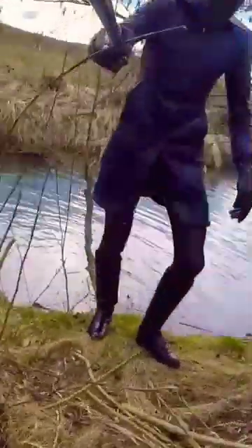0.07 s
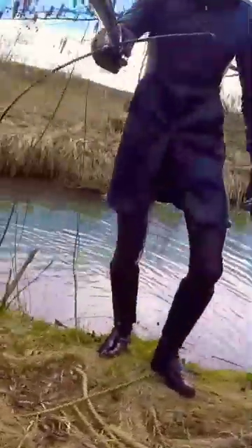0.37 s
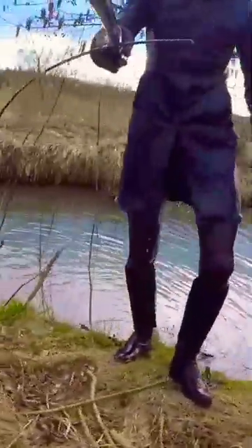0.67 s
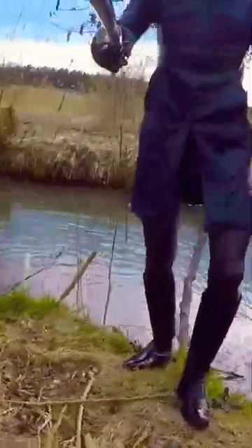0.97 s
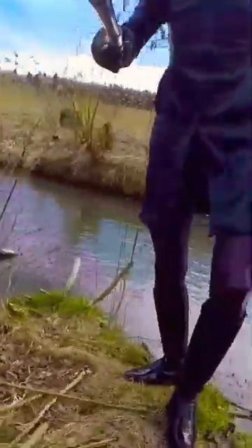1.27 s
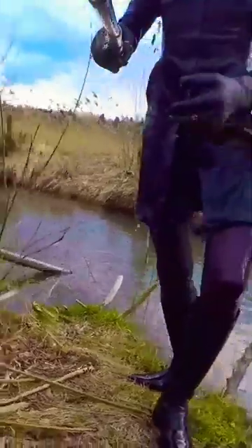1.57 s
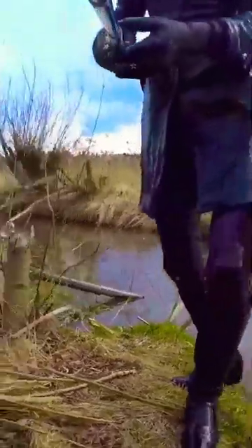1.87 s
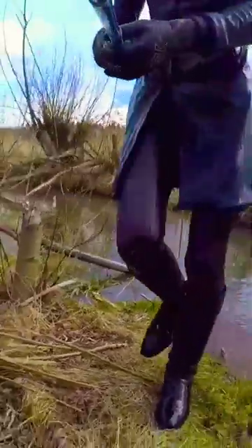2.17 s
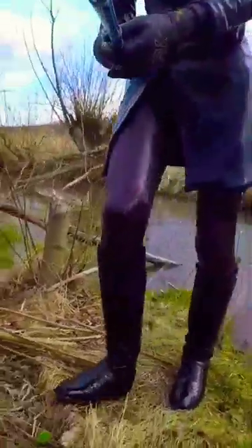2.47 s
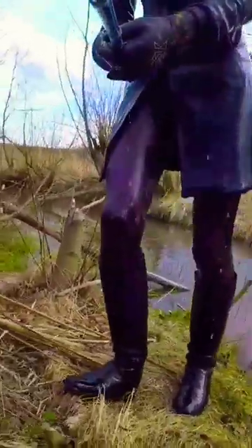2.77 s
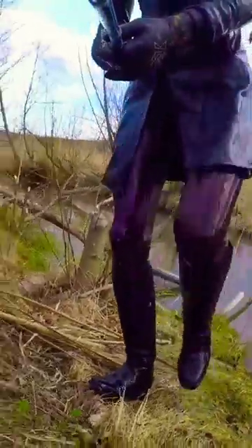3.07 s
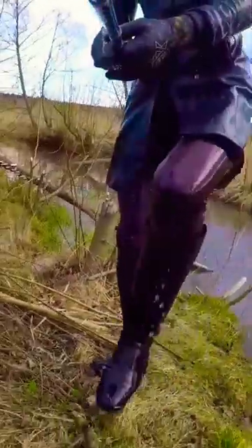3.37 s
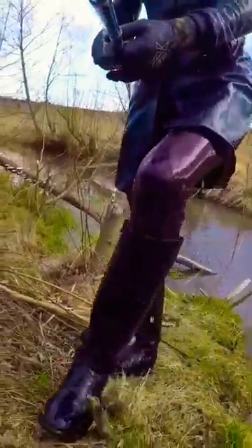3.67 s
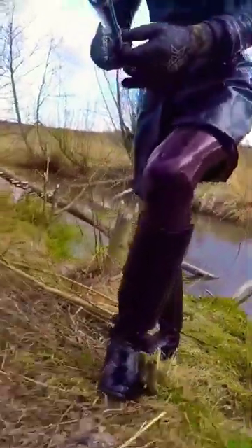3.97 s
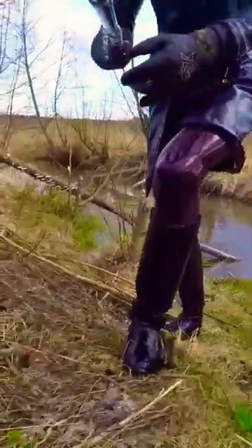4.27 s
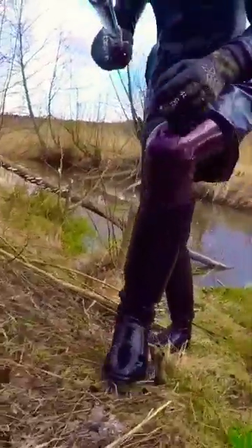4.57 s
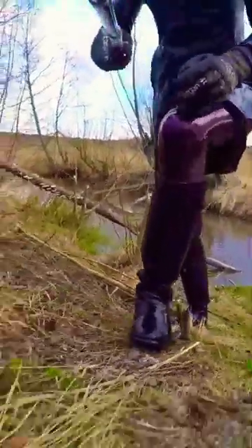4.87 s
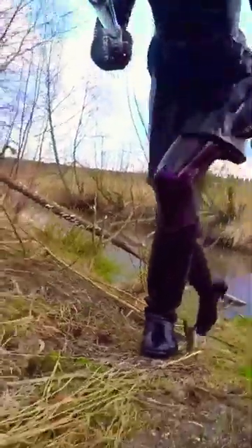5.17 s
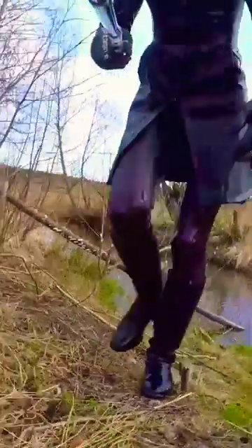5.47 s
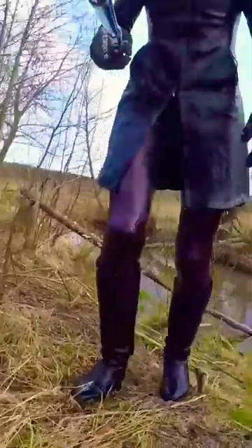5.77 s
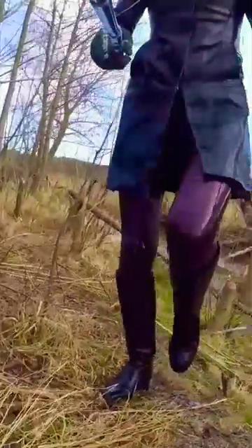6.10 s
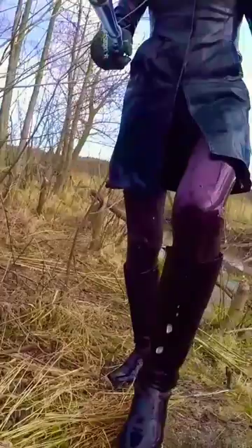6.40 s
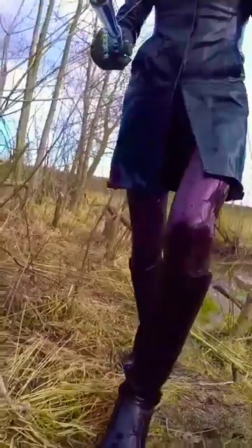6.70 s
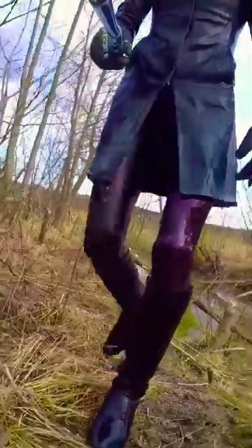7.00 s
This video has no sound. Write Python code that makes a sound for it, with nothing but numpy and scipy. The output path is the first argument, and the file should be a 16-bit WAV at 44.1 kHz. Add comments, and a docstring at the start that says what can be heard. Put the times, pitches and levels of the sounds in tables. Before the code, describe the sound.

Gusty low wind buffeting, close glove scrapes, knocks and thumps on a microphone pole, then soft squelching footsteps further off.

```python
"""A grassy riverbank, where someone in wet boots steps about with a microphone on a hand-held pole.
Wind buffets the microphone over a steady rush of air. A glove slides, scuffs, shoves and knocks the
pole: friction and impact excite its modes, and the tube conducts their ringing to the microphone.
Tiny ticks and faint whistles come and go; further off, the boots squelch and crunch in the wet grass."""
import sys
import numpy as np
from scipy import signal
from scipy.fft import rfft, irfft
from scipy.io import wavfile
from scipy.ndimage import uniform_filter1d

SR = 44100
rng = np.random.default_rng(int(sys.argv[2]) if len(sys.argv) > 2 else 0)


def file_out(sig):
    """Save sig as 16-bit WAV at sys.argv[1]."""
    # one column per channel
    cols = np.atleast_2d(sig).T
    # limit, then scale
    lim = np.clip(cols, -1, 1)
    pcm = np.round(lim * 32767).astype(np.int16)
    wavfile.write(sys.argv[1], SR, pcm)


N = 319284
TIME = np.arange(N) / SR
RING_TIME = TIME[:SR // 4]


def undb(db):
    """Decibels to amplitude ratio."""
    return 10 ** (np.asarray(db) / 20)


def unit(x):
    """Normalise to rms 1."""
    return x / np.sqrt(np.mean(x ** 2) + 1e-18)


def add(out, start_s, x):
    """Superpose x on out from start_s."""
    i = max(int(start_s * SR), 0)
    out[i:i + len(x)] += x[:N - i]


def band(x, low_hz, high_hz, order=2):
    """Band-pass between two edges."""
    edges_hz = [low_hz, min(high_hz, SR / 2 - 100)]
    return signal.sosfilt(signal.butter(order, edges_hz, "band", fs=SR, output="sos"), x)


def around(x, centre_hz, width_hz):
    """Band-pass about a geometric centre."""
    low_hz = np.hypot(centre_hz, width_hz / 2) - width_hz / 2
    return band(x, low_hz, low_hz + width_hz, order=3)


def noise(spectrum):
    """White noise shaped by (frequency_hz, density_db) points, at rms 1."""
    hz, db = np.transpose(spectrum)
    bin_hz = np.arange(N // 2 + 1) * SR / N
    gain = undb(np.interp(np.log(bin_hz + 1e-9), np.log(hz), db))
    return unit(irfft(rfft(rng.standard_normal(N)) * gain, N))


def drift(rate_hz):
    """Smooth random modulation of rms 1."""
    hold = int(SR / rate_hz)
    steps = np.repeat(rng.standard_normal(N // hold + 1), hold)
    return unit(uniform_filter1d(steps, hold)[:N])


def even(x, span_s):
    """Flatten the envelope by dividing by the running rms."""
    return x / np.sqrt(uniform_filter1d(x ** 2, int(span_s * SR)) + 1e-9)


def impulses(n, rate_hz, scatter_db):
    """Shot noise: tiny impacts of random time and size."""
    occurs = rng.random(n) < rate_hz / SR
    return unit(occurs * rng.standard_normal(n) * undb(scatter_db * rng.standard_normal(n)))


def ringing(hz, width_hz, db, build=0):
    """Impulse response of damped modes; build=1 couples each twice, so it swells before it decays."""
    age = np.pi * np.outer(width_hz, RING_TIME) * (1 + build / 2)
    modes = age ** build * np.exp(-age) * np.cos(2 * np.pi * np.outer(hz, RING_TIME))
    return (undb(db) * width_hz) @ modes


# spectra of large and of small eddies: frequency_hz, relative_density_db
SWELL_SPECTRUM = [(8, -9), (20, 4.5), (35, 8.5), (60, 4.5), (90, -5.5), (130, -23), (250, -85),
                  (1000, -110)]
BUFFET_SPECTRUM = [(50, -25), (85, 1.5), (125, 3.5), (165, -4), (208, -10), (250, -18), (330, -22),
                   (410, -26), (520, -32), (800, -40), (2000, -48.5), (8000, -100)]
# strength of the wind: time_s, swell_db, relative_buffet_db
GUSTS = [(0.0, -23.5, -50), (0.32, -24, -37), (0.46, -17, -36.5), (0.62, -31.5, -49), (1.13, -16, -30.5),
         (1.27, -29, -45), (1.55, -20.5, -41), (1.93, -15.5, -24.5), (2.12, -13.5, -20), (2.22, -30, -31),
         (2.26, -20.5, -31), (2.62, -27.5, -41.5), (2.92, -30, -37), (2.98, -15, -42), (3.04, -22, -35.5),
         (3.31, -14, -34.5), (3.37, -29.5, -33), (3.47, -11, -26.5), (3.61, -27.5, -37),
         (3.89, -23.5, -40.5), (3.97, -34, -37.5), (4.09, -24.5, -35.5), (4.34, -23.5, -32),
         (4.47, -21.5, -39), (4.6, -45, -47), (5.18, -29, -41.5), (5.24, -16.5, -36), (5.44, -21.5, -36.5),
         (5.73, -24.5, -37.5), (6.07, -11.5, -38), (6.29, -23.5, -40), (6.77, -34, -39), (6.81, -21, -50),
         (6.88, -27.5, -34.5), (7.04, -24, -33), (7.24, -20.5, -35)]

def wind(buffet_gain_db=1.5, eddy_db=2.0, flutter_db=3.5):
    """Turbulent pressure: large eddies push slowly on the microphone, small ones flutter."""
    time_s, swell_db, buffet_db = np.transpose(GUSTS)
    eddies_db = eddy_db * drift(14)
    swell = even(noise(SWELL_SPECTRUM), 0.077) * undb(np.interp(TIME, time_s, swell_db) + eddies_db)
    buffet = even(noise(BUFFET_SPECTRUM), 0.039) * undb(np.interp(TIME, time_s, buffet_db))
    return swell + buffet * undb(buffet_gain_db + eddies_db / 2 + flutter_db * drift(35))


# spectrum of the open air: frequency_hz, relative_density_db
AIR_SPECTRUM = [(150, 6), (250, 2), (350, -4), (500, -8.5), (720, -14), (1500, -18.5), (2200, -21.5),
                (3000, -28.5), (4000, -31), (5500, -34.5), (7600, -35.5), (8700, -30.5), (10300, -34),
                (11500, -39), (15000, -43)]

def air(rush_db=-44.5, hiss_db=-71.5):
    """Broadband ambient noise: a steady rush and a faint high hiss waver together."""
    waver_db = .5 * drift(6)
    rush = unit(band(noise(AIR_SPECTRUM), 195, 13600)) * undb(rush_db + waver_db)
    hiss = unit(band(rng.standard_normal(N), 3540, 4730)) * undb(hiss_db + 2 * waver_db)
    return rush + hiss


# modes of the pole: pitch_hz, width_hz, first_grip_db, second_grip_db, loose_grip_db, knocked_db
POLE_MODES = [(404, 35, 16.5, -2, -12, 7), (480, 54, 14, 13, -22, 2.5), (599, 75, 14, 17, 23, -18),
              (1065, 77, 5.5, 2.5, 14.5, 12), (1090, 180, -10, -32, -10, -33),
              (1474, 96, 5.5, 7.5, 11.5, 0), (1600, 85, 3, 7.5, 14, 18), (1815, 93, 2, 6, 13.5, -30),
              (2070, 125, -3.5, -3, 6, 6), (2675, 660, -9, -5, -18.5, 8.5), (2810, 197, -45, -3.5, 6, -6),
              (3390, 380, -17, -3, 2.5, -28), (3630, 317, -1.5, -2, 7, -31), (4590, 700, -7, -3, 4, -5),
              (4840, 180, -36, -0.5, -2, 7), (5120, 290, -8.5, -35, -23, 10.5),
              (5840, 790, -11.5, -7, -5, -11), (6340, 31, -8, -5, -32, 23), (6630, 9.1, -33, -15, -26, -14),
              (6930, 850, -22, -13.5, -13, -1), (9550, 580, -20, -15, -27, -35)]

def pole_response(grip):
    """Modal damping: where the hand holds the pole decides which resonances are subdued."""
    hz, width_hz, first_db, second_db, loose_db, _ = np.transpose(POLE_MODES)
    mode_db = {"first": first_db, "second": second_db, "loose": loose_db}[grip]
    return ringing(hz, width_hz, mode_db, build=1)


# slides along the pole: start_s, length_s, relative_pressure_db, relative_speed_db, growth_db, grip
GLOVE_STROKES = [(0.037, 0.27, -49.5, -43, 7.5, "first"), (0.385, 0.22, -43.5, -41, 4, "first"),
                 (0.621, .035, -49, -47, -10, "first"), (0.721, 0.16, -47.5, -41, 9, "first"),
                 (1.006, 0.077, -36, -39, 22, "first"), (1.085, 0.077, -32, -33, 3, "first"),
                 (2.033, 0.16, -32.5, -34, -10.5, "second"), (2.167, 0.17, -43.5, -44.5, 1, "second"),
                 (2.33, .282, -41.5, -43, 7.5, "loose"), (2.611, 0.11, -61, -52.5, 1, "loose"),
                 (2.722, 0.22, -56.5, -50.5, -18, "loose"), (2.958, 0.41, -48.5, -56, 2, "loose"),
                 (3.364, 0.24, -40.5, -51.5, -3, "second"), (3.777, 0.09, -53.5, -59.5, 8, "second"),
                 (3.987, 0.26, -45, -49.5, 0, "second"), (4.309, 0.092, -40, -46, -6, "second")]

def glove(grip, slip_hz, scatter_db, judder_db, low_db, high_db, top_hz):
    """Stick-slip friction rings the pole: pressure feeds the low modes, speed the high ones."""
    grab_s, release_s = 0.024, 0.023
    ease_db, waver_db = 3, 0.42  # the hand is slower at both ends of a stroke, and never quite even
    friction = even(impulses(N, slip_hz, scatter_db), 0.027) * undb(judder_db * drift(110))
    rub = signal.fftconvolve(friction, pole_response(grip))[:N]
    low = even(band(rub, 330, 2300, order=4), .06) * undb(low_db + waver_db * drift(25))
    high = even(band(rub, 2300, top_hz, order=4), .06) * undb(high_db + waver_db * drift(25))
    out = np.zeros(N)
    for start_s, length_s, pressure_db, speed_db, growth_db, stroke_grip in GLOVE_STROKES:
        if stroke_grip == grip:
            age_s = TIME - start_s
            contact = np.clip(age_s / grab_s, 0, 1) * np.clip((length_s - age_s) / release_s + .5, 0, 1)
            from_middle = np.clip(age_s / length_s, 0, 1) - .5
            effort = undb(growth_db * from_middle - ease_db * (2 * from_middle) ** 2)
            out += contact * effort * (low * undb(pressure_db) + high * undb(speed_db))
    return out


# short slips of the glove: start_s, level_db, length_s, centre_hz, width_hz
GLOVE_SCUFFS = [(0.078, -37, 0.011, 1330, 1600), (0.104, -41, 0.029, 1020, 1000),
                (0.245, -40, 0.023, 2600, 3000), (0.442, -29.5, 0.03, 1420, 1700),
                (0.448, -40.5, 0.05, 3700, 920), (0.476, -31.5, 0.0105, 2590, 7060),
                (0.518, -40, 0.027, 1770, 300), (0.704, -42, .013, 2400, 1900),
                (0.859, -38.5, 0.013, 2750, 3600), (0.974, -42, 0.0115, 2186, 2260),
                (1.154, -30.5, 0.0084, 7550, 8400), (2.039, -37, .008, 5000, 9000),
                (2.065, -28.5, .013, 3430, 1200), (2.146, -34, 0.0095, 3920, 5000),
                (2.378, -39, 0.033, 915, 1490), (2.541, -40.5, 0.077, 1230, 900),
                (3.393, -63.5, 0.18, 9700, 1200), (4.328, -51.5, 0.02, 7140, 4000),
                (4.471, -33.5, 0.01, 1500, 4950), (4.479, -38.5, 0.0083, 5470, 12000)]

def scuffs(direct_db=-5.0):
    """Transient friction: a burst of slips is heard directly and through the pole, which rings on."""
    out = np.zeros(N)
    pole = pole_response("first")
    for start_s, level_db, length_s, centre_hz, width_hz in GLOVE_SCUFFS:
        n = int(length_s * SR)
        friction = impulses(n, rate_hz=14000, scatter_db=0.88) * signal.windows.tukey(n, .25)
        burst = signal.fftconvolve(friction, pole / np.linalg.norm(pole))
        add(burst, 0, undb(direct_db) * friction)
        burst = band(around(burst, centre_hz, width_hz), 330, 7800, order=3)
        add(out, start_s, undb(level_db) * burst * np.sqrt(n / np.sum(burst ** 2)))
    return out


# slow bending of the pole: pitch_hz, width_hz, relative_level_db
BENDING_MODES = [(108.1, 11.9, 5.5), (143, 21, -4), (195, 12.2, -1), (400, 46, -23.5)]
# soft shoves of the hand: start_s, peak_db, contact_s, damping_time_s, upper_modes_db
HAND_SHOVES = [(0.106, -19.5, 0.0096, 0.018, -14), (0.478, -18, 0.0056, 0.03, -3),
               (1.012, -15, 0.0066, 0.041, 1), (1.155, -15.5, 0.0031, 0.022, 7.5),
               (1.752, -7.5, 0.0061, 0.027, -16), (2.043, -7.5, 0.0029, .06, 3),
               (2.071, -7, 0.0025, 0.061, 5), (2.095, -2, 0.0048, .14, 1.5), (2.145, -1.5, 0.005, 0.02, 8),
               (2.256, -18, 0.0057, 0.049, 3), (2.964, -13.5, 0.0066, 0.027, 1),
               (3.288, -12.5, 0.01, .03, -20), (3.551, -12, 0.0067, .046, -10),
               (3.629, -10, 0.0058, .047, -1.5), (4.039, -21, 0.0033, 0.084, 15),
               (4.315, -4.5, 0.0033, 0.11, 4), (4.448, -5.5, 0.0037, 0.018, 1.5),
               (4.49, -17, 0.004, 0.027, -14), (5.335, -12, 0.0086, 0.032, -15),
               (5.951, -9.5, 0.0094, 0.046, -22), (6.058, -7.5, 0.011, 0.054, -24),
               (6.146, -10, .011, 0.035, -24), (6.955, -11.5, .011, 0.26, -9),
               (7.124, -18.5, 0.0059, 0.054, 9.5)]

def shoves():
    """Flexural vibration: a soft push bends the pole, and the hand damps the thump."""
    out = np.zeros(N)
    hz, width_hz, mode_db = np.transpose(BENDING_MODES)
    for start_s, peak_db, contact_s, damping_time_s, upper_modes_db in HAND_SHOVES:
        bend = ringing(hz, width_hz, mode_db + upper_modes_db * (hz > np.median(hz)))
        force = np.hanning(int(contact_s * SR))
        thump = np.convolve(bend * np.exp(-RING_TIME / damping_time_s), force)
        add(out, start_s, undb(peak_db) * thump / np.abs(thump).max())
    return out


# tiny sharp ticks: start_s, peak_db
SHARP_TICKS = [(0.244, -33), (0.38, -28.5), (0.389, -42), (2.34, -31), (2.345, -33), (2.617, -40),
               (2.695, -30.5), (2.937, -23.5), (3, -36), (3.276, -39), (4.235, -37.5)]

def ticks(pitch_hz=7800, width_hz=3000):
    """Heavily damped oscillation: each bright tick lasts only a few cycles."""
    out = np.zeros(N)
    ring = np.exp(-np.pi * width_hz * RING_TIME) * np.sin(2 * np.pi * pitch_hz * RING_TIME)
    tick = band(ring, 5000, 10100, order=3)
    for start_s, peak_db in SHARP_TICKS:
        add(out, start_s, undb(peak_db) * tick / np.abs(tick).max())
    return out


# hard contacts with the pole: start_s, peak_db, cutoff_hz, lowest_mode_db
POLE_KNOCKS = [(1.0681, -5.5, 3960, 12.5), (1.1333, -3, 4480, 7), (1.1345, -7, 596, 8.5),
               (2.039, -15.5, 2360, 2), (2.042, -14, 676, 10), (2.074, -22, 584, 13),
               (4.310, -20.5, 437, 9), (4.445, -21.5, 476, 4), (6.871, -23, 456, -1)]

def knocks(crack_db=-9, crack_decay_s=.0015):
    """Impulsive excitation: a hard contact rings every mode; a softer one loses the treble."""
    out = np.zeros(N)
    hz, width_hz, *_, knocked_db = np.transpose(POLE_MODES)
    for start_s, peak_db, cutoff_hz, lowest_mode_db in POLE_KNOCKS:
        ring = ringing(hz, width_hz, knocked_db + lowest_mode_db * (hz == hz.min()))
        crack = rng.standard_normal(len(RING_TIME)) / 2 * np.exp(-RING_TIME / crack_decay_s)
        knock = band(ring / ring.max() + undb(crack_db) * crack, 140, cutoff_hz, order=3)
        add(out, start_s, undb(peak_db) * knock / np.abs(knock).max())
    return out


# thin whistles, perhaps far birds: start_s, length_s, pitch_hz, level_db
FAR_WHISTLES = [(1.154, 0.77, 4610, -71.5), (1.867, 0.16, 2460, -65), (2.73, 0.079, 4340, -55),
                (3.054, 0.19, 4080, -58), (4.247, .3, 4050, -64)]

def whistles(width_hz=380, flicker_db=4.5):
    """Narrow-band noise has a blurred pitch, heard as a distant, flickering whistle."""
    out = np.zeros(N)
    flicker = rng.standard_normal(N) * undb(flicker_db * drift(45))
    for start_s, length_s, pitch_hz, level_db in FAR_WHISTLES:
        i, n = int(start_s * SR), int(length_s * SR)
        whistle = around(flicker[i:i + n], pitch_hz, width_hz) * signal.windows.tukey(n, .5)
        add(out, start_s, undb(level_db) * unit(whistle))
    return out


# treads in wet grass: start_s, squelch_db, tread_s, centre_hz, relative_straw_db
FOOTSTEPS = [(1.812, -42.5, 0.0057, 1360, -22), (5.042, -52, 0.037, 1940, -7), (5.2, -53, .01, 3720, -2),
             (5.234, -44, 0.038, 1280, -9.5), (5.28, -55, 0.034, 2450, -12),
             (5.332, -46, 0.0054, 1700, -24), (5.429, -42.5, 0.056, 634, -28), (5.902, -47, .051, 1210, -6),
             (5.971, -58, .15, 1500, -3), (6.207, -57, .012, 4800, -5), (6.61, -57, 0.019, 1400, -16),
             (6.868, -42, .016, 550, -19), (6.893, -42, 0.076, 566, -13), (7.012, -50, 0.14, 744, -8.5)]

def boots(pops_per_s=3000, cracks_per_s=1800, snap_db=-6.5):
    """Shot noise under load: a tread presses water from the turf in tiny pops and snaps dry straw."""
    out = np.zeros(N)
    for start_s, squelch_db, tread_s, centre_hz, straw_db in FOOTSTEPS:
        n = int(3 * tread_s * SR)
        progress = TIME[:n] / tread_s
        weight = (2 * progress) ** 2 * np.exp(2 - 4 * progress)  # peaks at mid-tread
        pops = impulses(n, pops_per_s, scatter_db=3.0)
        squelch = even(band(pops, centre_hz / 1.9, centre_hz * 1.7), .02)
        stalks = impulses(n, cracks_per_s, scatter_db=3.0)
        crunch = unit(band(stalks, 2600, 3920, order=3))
        snaps = undb(snap_db) * unit(band(stalks, 6100, 14000))
        add(out, start_s, undb(squelch_db) * weight * (squelch + undb(straw_db) * (crunch + snaps)))
    return out


def scene():
    """Superposition: structure-borne sound, airborne sound and wind sum at one microphone."""
    handling = glove("first", slip_hz=7000, scatter_db=1.0, judder_db=1.3,
                     low_db=-1.5, high_db=-1.5, top_hz=9400)
    handling += glove("second", slip_hz=9000, scatter_db=2.0, judder_db=1.8,
                      low_db=-1.5, high_db=-2.5, top_hz=14000)
    handling += glove("loose", slip_hz=11000, scatter_db=3.5, judder_db=1.85,
                      low_db=-2.0, high_db=-2.0, top_hz=9500)
    handling += scuffs() + knocks() + shoves()
    return (handling + ticks() + boots() + wind() + air() + whistles())[None]


def record(dry):
    """Soft saturation rounds the peaks, short fades smooth both ends and a low-pass cuts the top."""
    fade_s, cutoff_hz = .008, 15000
    fades = np.clip(np.minimum(TIME, TIME[-1] - TIME) / fade_s, 0, 1)
    rounded = np.tanh(0.87 * dry) / 0.92
    low_pass = signal.ellip(10, .2, 80, cutoff_hz, fs=SR, output="sos")
    return signal.sosfilt(low_pass, fades * rounded)


dry = scene()
out = record(dry)
file_out(out)
```